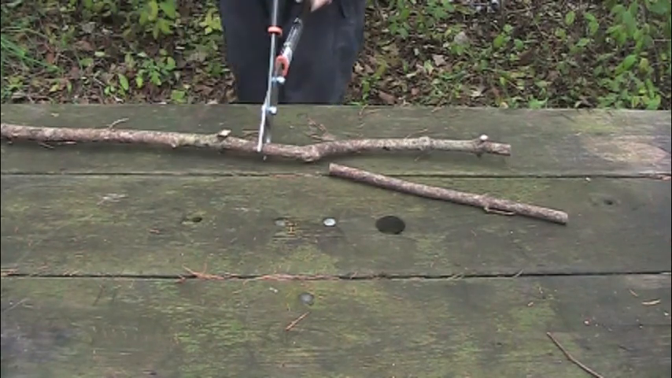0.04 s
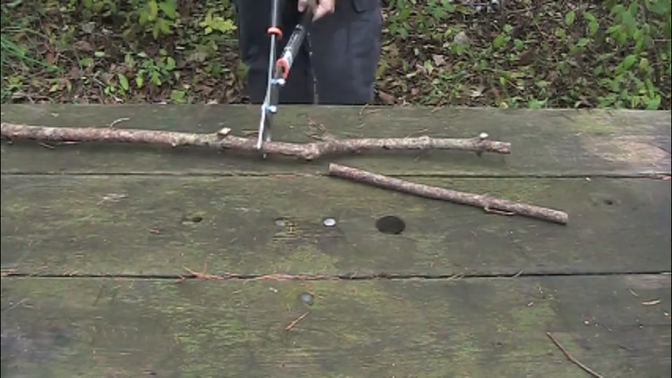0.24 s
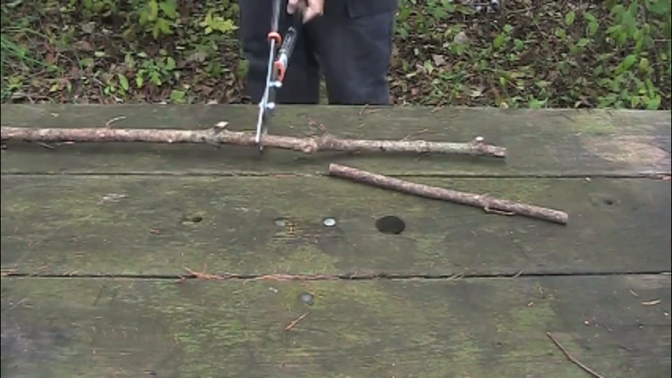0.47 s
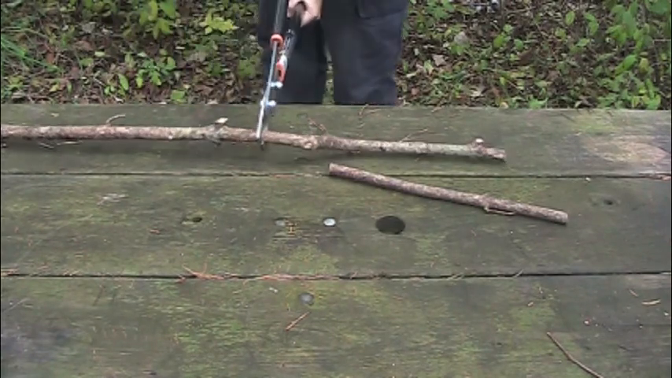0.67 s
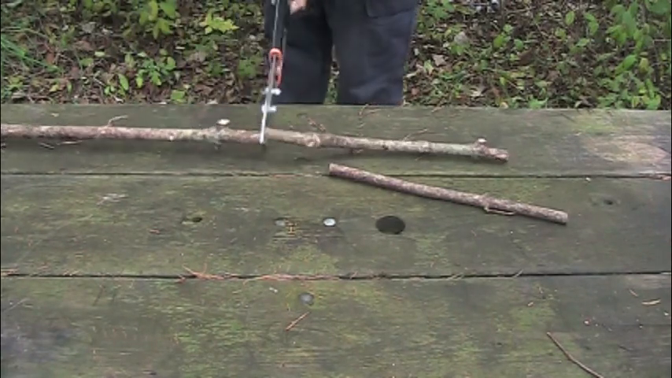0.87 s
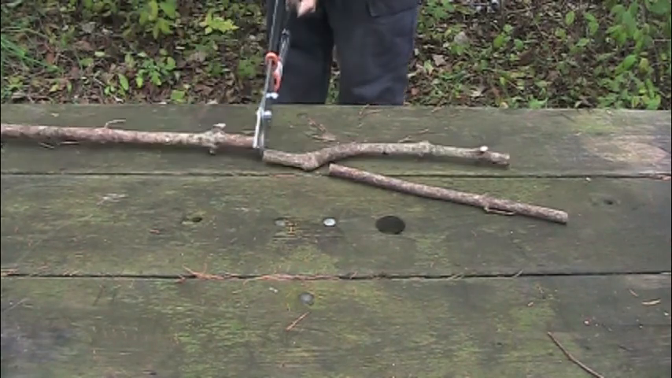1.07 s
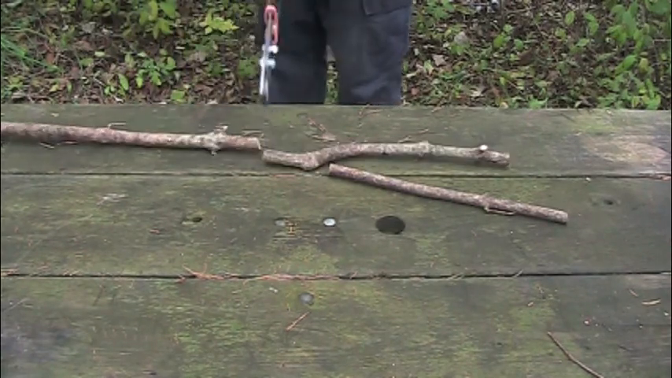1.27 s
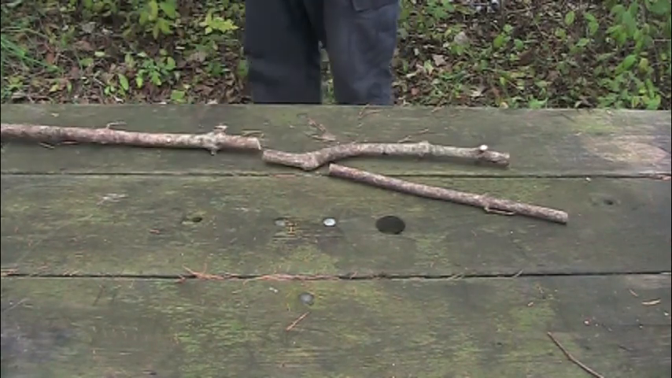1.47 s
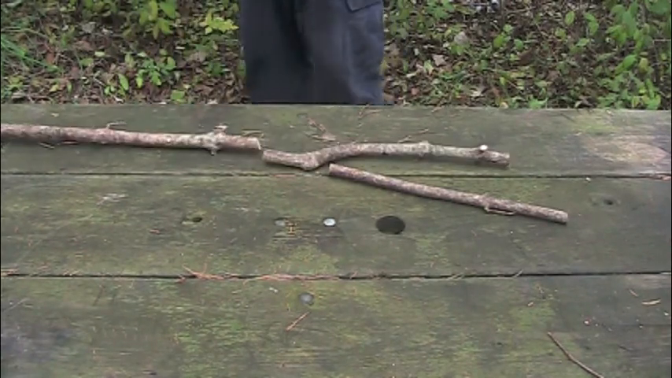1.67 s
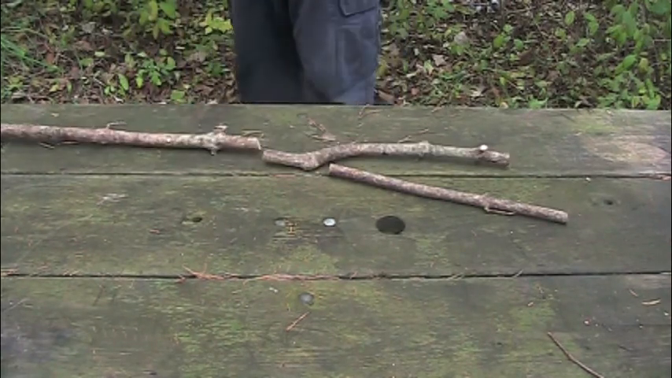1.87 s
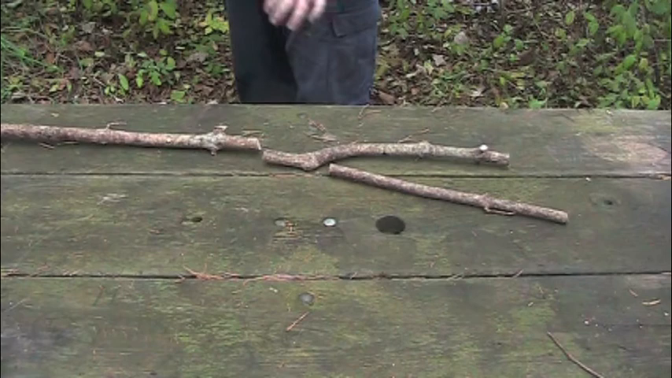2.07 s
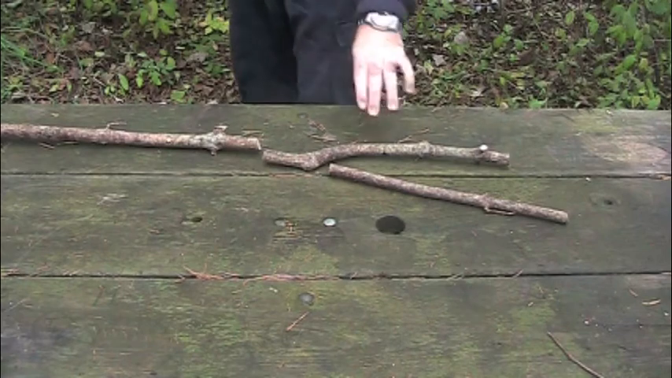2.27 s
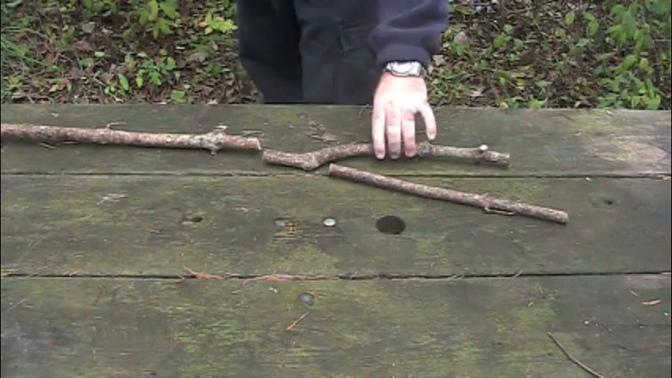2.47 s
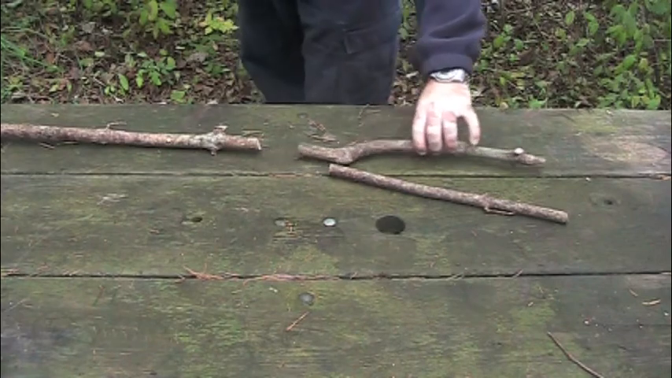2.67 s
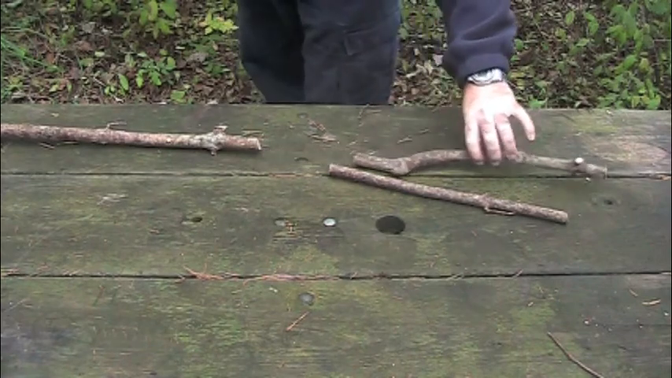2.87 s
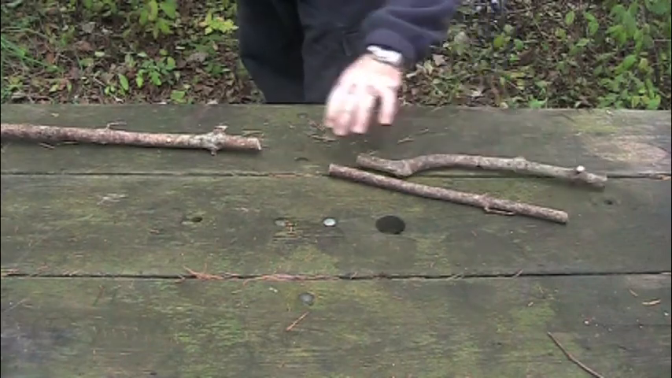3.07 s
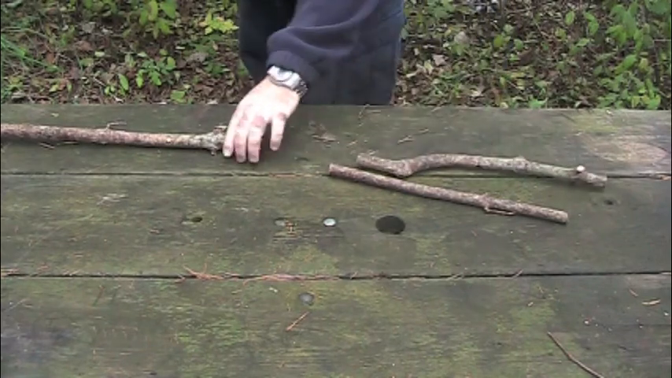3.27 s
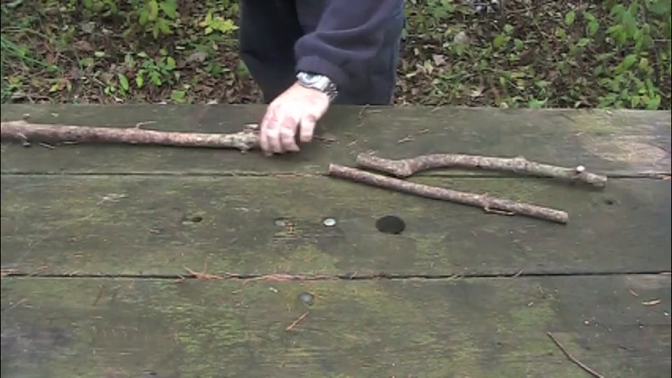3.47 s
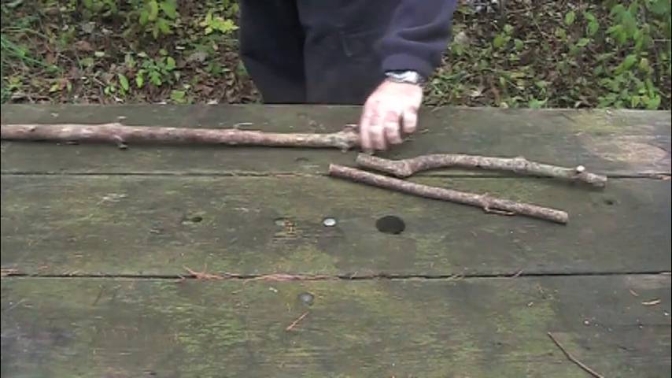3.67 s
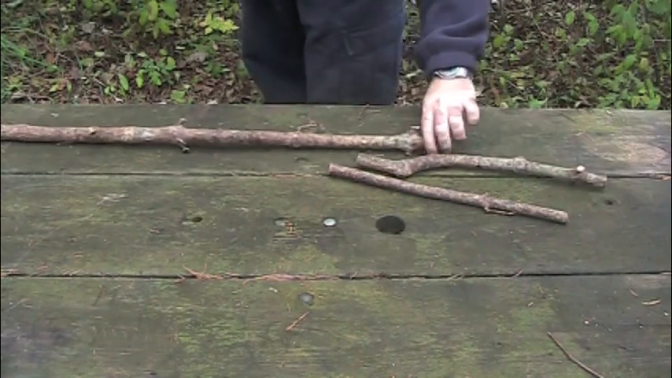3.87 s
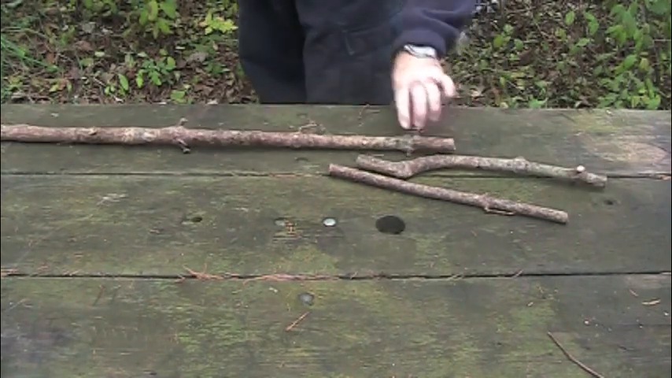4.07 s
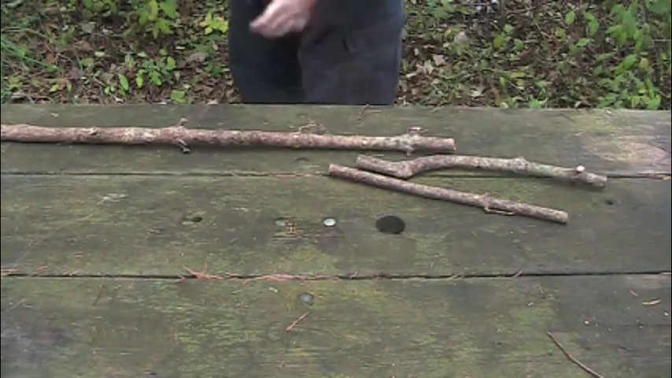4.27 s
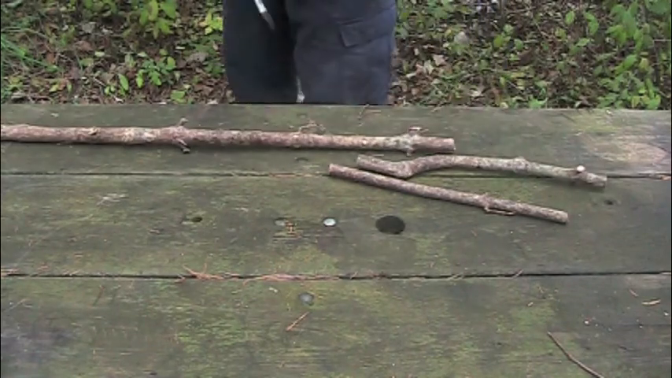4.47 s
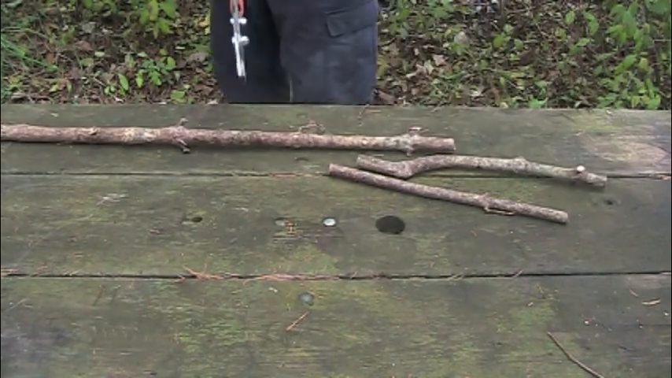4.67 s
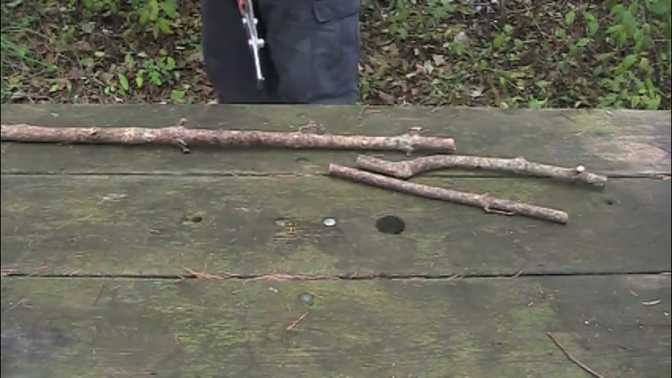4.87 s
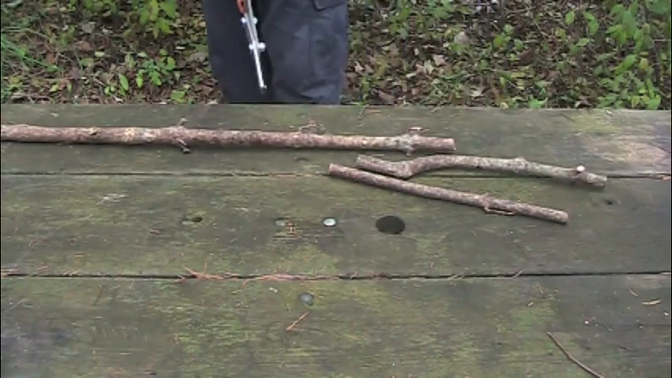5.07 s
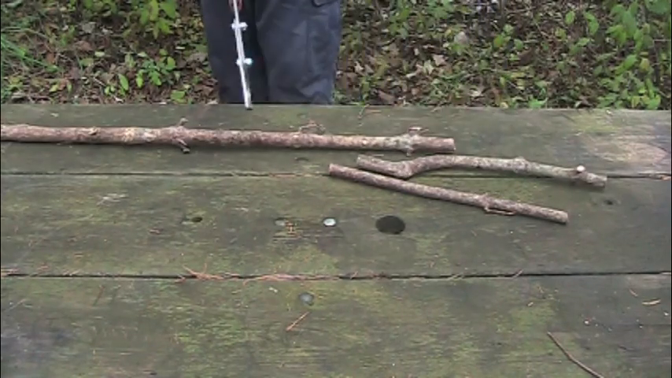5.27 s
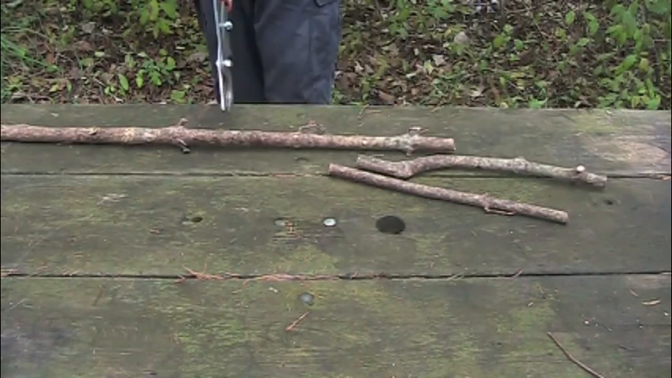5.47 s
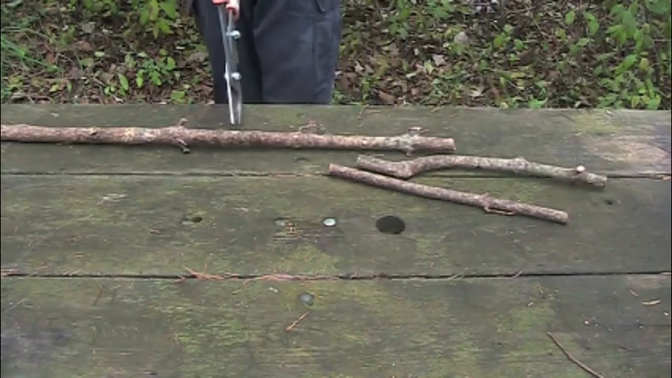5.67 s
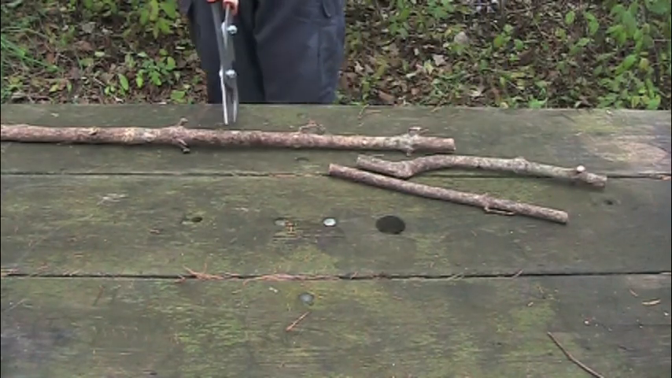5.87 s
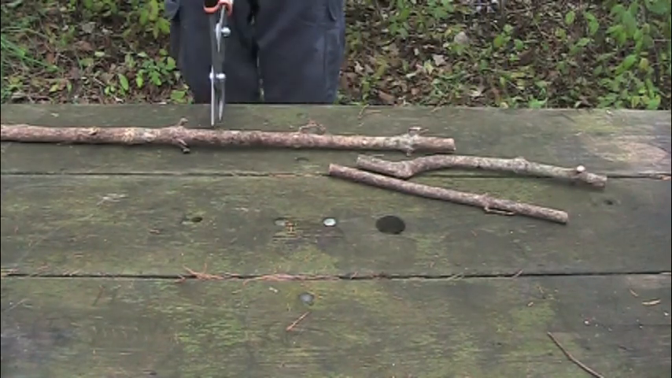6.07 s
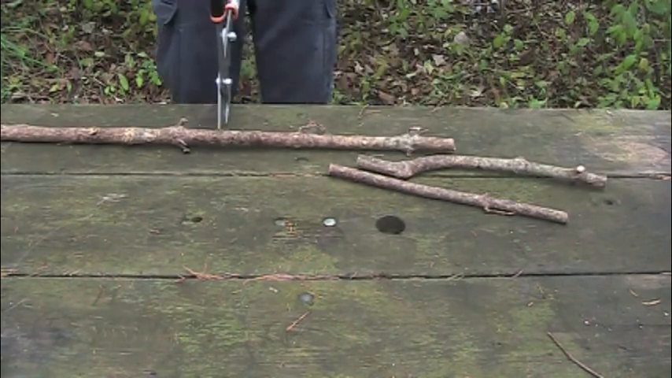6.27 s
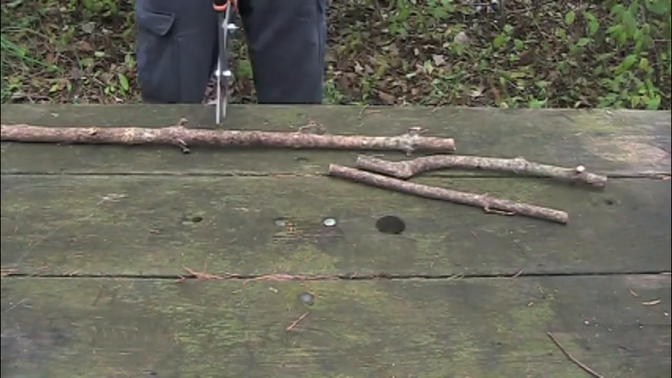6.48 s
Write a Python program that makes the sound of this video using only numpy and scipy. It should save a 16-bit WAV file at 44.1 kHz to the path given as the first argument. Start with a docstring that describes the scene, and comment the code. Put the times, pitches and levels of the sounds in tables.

```python
"""Loppers bite into a stick on a plank table outdoors: the pivot clicks brightly, and noise bursts for cracking
fibres ring the blade. The cut piece drops and bounces, is tossed aside by hand, and the branch is dragged:
blows and slips ring the planks. Sleeves rustle and something brushes past, both as swelling noise; the handles
knock as short coloured bursts. Behind lie a steady noise of far traffic and leaves, a faint far whine that
swells once, a small motor close by that ticks in a steady pattern, and faint echoes."""
import sys
import numpy as np
from scipy import signal
from scipy.fft import rfft, irfft
from scipy.io import wavfile

SR = 44100
rng = np.random.default_rng(int(sys.argv[2]) if len(sys.argv) > 2 else 0)


def materialize(psi):
    """Save the field psi as 16-bit PCM at rate SR to the path in sys.argv[1].

    A 1-D psi becomes a single channel; in a 2-D psi each row is a channel.
    """
    bounded = np.clip(np.atleast_2d(psi).T, -1, 1)
    quanta = np.round(bounded * 32767).astype(np.int16)
    wavfile.write(sys.argv[1], SR, quanta)


N = 288400   # length in samples
LEFT_DB = -1   # left against right, for all but the tool and the blows


def amp(db):
    """Turn decibels into a plain gain."""
    return 10 ** (np.asarray(db) / 20)


def rms_one(x):
    """Scale a sound to an rms of 1."""
    return x / np.sqrt(np.mean(x ** 2) + 1e-20)


def at_hz(points, hz):
    """Read a curve at a frequency, with straight lines over log frequency."""
    table_hz, values = np.transpose(points)
    return np.interp(np.log(hz), np.log(table_hz), values)


def sides(left_db):
    """Left and right gains for a level difference."""
    return amp(np.array([[.5], [-.5]]) * left_db)


def drift(rate):
    """A slow random wander of rms 1; a higher rate wanders faster."""
    step = 40   # samples between the points of the slow curve
    r = np.exp(-2 * np.pi * step * rate / SR)
    white = rng.standard_normal(N // step + 2002)
    slow = signal.lfilter([1], [1, -2 * r, r * r], white)[2000:]
    return np.interp(np.arange(N) / step, np.arange(len(slow)), rms_one(slow))


def ring(x, hz, t60):
    """A unit click sets off a sine of height 1 that falls 60 dB in t60 seconds."""
    r, w = amp(-60 / (t60 * SR)), 2 * np.pi * hz / SR
    return signal.lfilter([0, np.sin(w)], [1, -2 * r * np.cos(w), r * r], x + 1e-18)


def resonate(x, hz, width):
    """A resonance lets through sound around hz, with gain 1 on top."""
    r = np.exp(-np.pi * width / SR)
    feedback = [1, -2 * r * np.cos(2 * np.pi * hz / SR), r * r]
    return signal.lfilter(np.array([1, 0, -1]) * (1 - r * r) / 2, feedback, x)


def swells(rows):
    """Each row rises, holds and falls; one gain in time per level column, powers added."""
    t, power = np.arange(N) / SR, 1e-20
    for s, rise, hold, fall, *levels_db in rows:
        before = (s - t) / max(rise, .002)
        after = (t - s - abs(hold)) / max(fall, .002)
        below = np.maximum(before, after).clip(0, 6)   # in steps of 20 dB
        power = power + amp(2 * (np.array(levels_db)[:, None] - 20 * below))
    return np.sqrt(power)


def band_swell(rows, hz, width):
    """Noise sent twice through a resonance, swelling by the rows."""
    noise = resonate(rng.standard_normal(N), hz, width)
    return swells(rows)[0] * rms_one(resonate(noise, hz, width))


def banded_noise(spectrum, likeness, patchy_db, grain_db):
    """Half-octave bands of stereo noise, each with its own level, flicker and likeness; rms 1."""
    out, together = 0, drift(9.1)
    edges = 2 ** np.arange(np.log2(spectrum[0][0]), np.log2(spectrum[-1][0]) + .3, .5)
    white = rng.standard_normal((2, 2, N)) * amp(grain_db * drift(130))   # grains come in clumps
    for k, (low, high) in enumerate(zip(edges, edges[1:])):
        band = signal.butter(2, [low, high], "band", fs=SR, output="sos")
        mid, side = signal.sosfilt(band, white[k % 2])
        hz = np.sqrt(low * high)
        alike = np.clip(at_hz(likeness, hz), -1, 1)
        gain = amp(at_hz(spectrum, hz) + patchy_db * (0.62 * together + drift(9.2)))
        out = out + gain * (np.sqrt(1 + alike) * mid + np.sqrt(1 - alike) * side * [[1], [-1]])
    return rms_one(out)


def bursts(rows, width, order=1, uneven_db=0):
    """Each row is a puff of noise that dies away, coloured by a broad resonance (twice: purer)."""
    out, size = np.zeros(N), SR // 10
    t = np.arange(size) / SR
    noise = rng.standard_normal((len(rows), size))
    noise = noise * amp(uneven_db * rng.exponential(1, noise.shape).clip(0, 4))
    for (s, db, hz, t60), white in zip(rows, noise):
        fall = amp(-60 * t / max(t60, .002))
        puff = white * fall
        for _ in range(order):
            puff = resonate(puff, min(hz, 16000), width * hz)
        start = round(s * SR)
        same_energy = np.sqrt((fall ** 2).sum() / (puff ** 2).sum())
        out[start:start + size] += amp(db - 7.5) * puff * same_energy   # peaks stand above the rms
    return out


# short noise bursts: cracking fibres, a few knocks and the blow's noisy tail:
# t/s, level/dB before the blade, f/Hz, t60/s
CRACKS = [(0.3611, -24, 4100, 0.014), (.535, -54, 3330, 0.011), (0.6275, -35.5, 3540, 0.0036),
          (0.6799, -38, 4250, 0.025), (0.7063, -34, 3624, 0.012), (.65, -44.5, 3703, .015),
          (.672, -45, 4210, 0.013), (.721, -47, 4206, 0.011), (0.7906, -38.5, 3494, 0.012),
          (.801, -46, 6280, 0.01), (0.8128, -30, 3492, 0.009), (0.8294, -40, 3557, 0.011),
          (.848, -38.5, 3325, .012), (0.8678, -21.5, 3480, 0.04), (0.8737, -8, 3000, 0.016),
          (.8745, -13, 6600, .02), (0.8755, -18, 1915, 0.02), (0.8864, -29.5, 2970, 0.035),
          (0.8992, -25, 4500, 0.02), (0.9015, -13, 3211, 0.015), (0.903, -21.5, 1500, 0.045),
          (0.9295, -15.5, 1960, 0.03), (.938, -31, 1600, .09), (1.074, -37.5, 4900, 0.018),
          (2.089, -50, 6280, 0.02), (2.9462, -39.5, 3220, 0.0095), (3.4765, -52, 3000, 0.019),
          (4.0427, -55, 3510, 0.047)]
UNEVEN_DB = 3   # how uneven the grains within one burst are
# the blade shearing through the wood: t/s, level/dB before the blade
SHEAR = [(.2, -80), (.37, -61), (.45, -61.5), (.5, -77.5), (.76, -58), (.81, -54.5), (.865, -46),
         (.922, -44), (.97, -88.5)]
FIBRES_PER_S = 1500
# resonances of the blade: f/Hz, width f/Hz, level/dB against each other
BLADE = [(700, 310, 4.5), (1222, 132, 8), (1600, 190, -1.5), (2190, 160, 1.5), (2550, 350, -3.5),
         (2940, 92, -10.5), (3169, 86, -1), (3370, 130, -2), (3733, 230, -4), (4370, 690, -3.5),
         (5000, 170, -18.5), (6210, 200, -7.5), (6540, 690, -4.5), (7000, 150, -9), (7550, 120, -15),
         (9360, 253, -17)]
BLADE_DB, BLADE_WAVER_DB, BLADE_WAVERS_PER_S = 7.5, 1.5, 25
# bright clicks of the pivot while the jaws close: t/s, level/dB
TICKS = [(.237, -47), (0.2576, -43), (0.276, -49), (0.2848, -37), (0.37, -31.5), (0.398, -43),
         (0.4026, -47), (0.418, -41), (0.4304, -37), (0.4435, -35), (0.453, -38), (0.492, -43), (.588, -50),
         (0.622, -38.5), (0.63, -32.5), (.6405, -45.5), (0.6504, -44), (0.68, -41), (0.741, -42.5),
         (0.868, -25), (0.871, -27)]
TICK_HZ, TICK_T60_S = 15510, 0.012
# handles knocking together: t/s, level/dB, f/Hz, t60/s
HANDLES = [(5.132, -33.5, 1024, 0.073), (5.1335, -41, 2680, 0.024), (5.146, -33.5, 1420, 0.04),
           (5.144, -38, 3740, 0.038), (5.1445, -42, 4850, .02), (5.146, -36, 558, 0.029),
           (5.2805, -41, 1320, 0.029), (5.282, -47, 583, 0.057), (5.489, -49, 1383, 0.049),
           (5.737, -48, 1306, 0.066)]


def loppers():
    """Noise bursts and shearing ring through the blade; pivot clicks and handle knocks stay dry."""
    shear_db = np.interp(np.arange(N) / SR, *np.transpose(SHEAR))
    sizes = amp(4.5 * rng.exponential(1, N).clip(0, 4)) * rng.choice([-1, 1], N)
    fibres = (rng.random(N) < FIBRES_PER_S / SR) * sizes   # many small fibres tearing
    fibres = resonate(resonate(fibres, 4000, 4100), 4000, 4100)
    cracks = bursts(CRACKS, width=0.61, uneven_db=UNEVEN_DB)
    driven = cracks + amp(shear_db) * rms_one(fibres)
    blade = 0
    for k, (hz, width, db) in enumerate(BLADE):
        # each resonance wavers at random; neighbours swing against each other
        gain = amp(db + BLADE_WAVER_DB * drift(BLADE_WAVERS_PER_S))
        blade = blade + gain * resonate(driven, hz, width) * (-1) ** k
    ticks = bursts([(s, db, TICK_HZ, TICK_T60_S) for s, db in TICKS], width=0.538)
    knocks = bursts(HANDLES, width=0.29, order=2)
    return cracks * 0.59 + amp(BLADE_DB) * blade + ticks + knocks


# blows of wood on the planks: t/s, level/dB of the push, contact/ms,
# extra level/dB into the deep planks, extra level/dB into the frame, left-right level/dB
BLOWS = [(0.442, -40.5, 5.2, 5.5, 12, -5), (0.666, -42.5, 3, 12, -5.5, -5),
         (0.9215, -41, 2.2, 19, 7, -11.5), (0.93, 2, 0.53, -0.5, -2.5, -3.5),
         (0.9348, -8.5, 3.2, 3.5, 4.5, -2.5), (0.9532, -15, 1.1, 0, -4, -5), (0.968, -16.5, 2.3, 7, -6, -1),
         (1.02, -41, 3.1, 6, 3, -4), (1.0883, -25, 0.84, 3.5, 2, -3), (1.092, -24, 0.67, -21, -22, -3.5),
         (1.111, -53, 2.3, 7, 11, -8.5), (1.131, -50, 2, 17, 2, -12), (1.165, -45, 2.9, 9, 2, -5),
         (1.193, -40.5, 2.1, 17.5, 9.5, -3), (1.205, -40.5, 2.2, 0, 14, -6),
         (1.229, -42.5, 3.2, 10, -2, -7), (1.262, -48, 3.1, 15.5, 10, -6), (1.295, -51, 3.4, 14, 13, -2),
         (1.372, -50, 2.5, 12, 12, -2.5), (2.847, -62, 2.4, -2.5, 32, -1.5), (2.877, -49, 2.7, 14, 13, -2),
         (2.899, -48, 1.4, -6, -3, -3), (2.935, -43.5, 0.67, 24.5, 4, -5), (2.946, -15, 0.71, -8, -1.4, -4),
         (2.958, -31.5, 2.36, 7.5, -5, -3), (2.975, -50.5, 1.5, 21, -11, -3), (2.992, -29, 2, -10, 9, -3),
         (3.026, -41, 2.6, 3.5, 10, -4), (3.936, -49, 2, 11, 16.5, -1)]
RATTLE_DB, RATTLE_T60_S, RATTLE_HZ = -34, .1, 2500   # trembling after each blow, dull above RATTLE_HZ
# the branch rubbing on the planks, one row a stroke: peak t/s, rise t/s, hold t/s, fall t/s,
# level/dB, extra level/dB into the deep planks; rise and fall span 20 dB
RUB = [(0.001, 0.063, 0.054, 0.017, -51.5, 2.5), (0.373, 0.15, .005, 0.042, -43.5, 9),
       (0.44, 0.045, 0.038, 0.02, -45.5, 10), (0.77, 0.26, 0.11, 0.017, -58, 17),
       (0.858, 0.0057, 0.064, 0.016, -29.5, 0), (1.135, .05, 0.047, 0.098, -43.5, 12.5),
       (1.249, .05, 0.054, 0.2, -57, 12.5), (3.536, 0.25, 0.066, 0.084, -55, 6.5),
       (3.492, 0.11, 0.044, 0.11, -48.5, 12.5), (3.637, 0.19, 0.052, 0.13, -36.5, 6),
       (3.775, 0.14, 0.014, 0.095, -65, 5), (4.052, 0.37, 0.02, 0.015, -53.5, 10)]
RUB_PER_S = 1200
# colour of the rasping bark: f/Hz, width f/Hz, level/dB
SCRAPE = [(997, 570, 1.5), (2300, 1100, -1)]
SCRAPE_DB = 27
# ringing of the planks: f/Hz, level/dB at the cut, level/dB where the piece lands,
# level/dB under the dragged branch, t60/s before the limit below
PLANKS = [(82.34, -10.5, -11.5, -27, .2), (140, -19, -15.5, -20.5, 0.13), (163.1, -20, -18, -15.5, 0.27),
          (195.2, -18, -19.5, -22, 0.36), (225.5, -21, -11, -15, 0.35), (253.4, -19, -14, -21.5, 0.3),
          (327, -24.5, -19, -24, 0.28), (372.1, -14, -15, -25, 0.14), (414.6, -16, -32, -9, .14),
          (480, -19, -7.5, -9, 0.15), (522, -16.5, -6.5, -9, 0.14), (563, -26, -21, -13, 0.15),
          (599, -23.5, -11, -6.5, 0.073), (685, -24.5, -8.5, -17, 0.069), (710, -24.5, -9, -20, 0.063),
          (767, -26.5, -14, -14, 0.093), (820, -21, -37, -22, 0.021), (885, -22.5, -26, -8.5, 0.051),
          (977, -34, -31, -21, 0.084), (1092, -8, -17, -14, 0.016), (1191, -34, -16.5, -8, 0.041),
          (1443, -25, -13, -16, 0.053), (1530, -20.5, -23, -13.5, 0.05), (1640, -24, -14, -10, 0.025),
          (1885, -14.5, -11.5, -21, .05), (2060, -21, -8, -16.5, 0.044), (2300, -28.5, -30, -31, 0.018)]
# short knock of the stick itself: same columns
THUDS = [(425, 6.5, 9.5, -15.5, 0.014), (185.2, 0.5, -2.5, -17, 0.027), (1190, -8.5, -5.5, -16, 0.0077),
         (1800, -21, -6, -27, 0.013)]
LONGEST_RING_CYCLES = 70   # damp wood lets no mode ring longer
FRAME_HZ, DEEP_HZ = 185, 320   # the frame rings below the first, the deep planks up to the second
RADIATES_ABOVE_HZ = 140
TOSSED_S, DRAGGED_S = 2.5, 3.3   # from here on the wood meets another place of the table
WOOD_RESTS_S = 4.6   # the plank ringing stops here


def planks():
    """Blows and rubbing drive the same plank modes; a longer contact is duller."""
    frame, deep, high = np.zeros((3, 2, N + SR))
    t = np.arange(SR // 8) / SR
    dull = signal.butter(1, RATTLE_HZ, fs=SR)
    rattles = signal.lfilter(*dull, rng.standard_normal((len(BLOWS), len(t))))
    rattles = rattles * amp(RATTLE_DB - 60 * t / RATTLE_T60_S)
    for (s, db, contact_ms, deep_db, frame_db, left_db), force in zip(BLOWS, rattles):
        force[0] = 1   # the blow itself, then the stick trembles against the grain
        push = np.hanning(max(round(contact_ms * SR / 1000), 1) + 2)
        force = amp(db) * sides(left_db) * np.convolve(force, push / push.sum())
        start = round(s * SR)
        at = slice(start, start + force.shape[1])
        high[:, at] += force
        deep[:, at] += amp(deep_db) * force
        frame[:, at] += amp(frame_db) * force

    # bark rasps when dragged, less when it rolls
    strokes = [(*shape, db, db + deep_db, db + SCRAPE_DB - 2 * deep_db) for *shape, db, deep_db in RUB]
    rub, rub_deep, rasp = swells(strokes)
    slips = (rng.random(N) < RUB_PER_S / SR) * rng.standard_normal(N)   # bark catching on the grain
    slips = amp(-18.0) * slips * sides(LEFT_DB)
    busy = int(WOOD_RESTS_S * SR)
    frame = (frame[:, :N] + rub_deep * slips)[:, :busy]
    deep = (deep[:, :N] + rub_deep * slips)[:, :busy]
    high = (high[:, :N] + rub * slips)[:, :busy]

    # each place wakes the modes in its own measure
    place = np.searchsorted([TOSSED_S, DRAGGED_S], np.arange(busy) / SR)
    sound = 0
    for body in (PLANKS, THUDS):
        for k, (hz, *place_db, t60) in enumerate(body):
            force = frame if hz < FRAME_HZ else deep if hz < DEEP_HZ else high
            mode = ring(amp(place_db)[place] * force, hz, min(t60, LONGEST_RING_CYCLES / hz))
            sound = sound + mode * (-1) ** k   # neighbouring modes swing against each other
    sound = np.pad(sound, [(0, 0), (0, N - busy)])
    for hz, width, db in SCRAPE:
        sound = sound + amp(db) * resonate(rasp * slips, hz, width)
    radiate = signal.butter(3, RADIATES_ABOVE_HZ, "high", fs=SR, output="sos")
    return signal.sosfilt(radiate, sound)


# sleeves and leaves stirred, one row a movement: peak t/s, rise t/s, hold t/s, fall t/s,
# swish level/dB, hiss level/dB; rise and fall span 20 dB
RUSTLE = [(.318, 0.13, 0.13, 0.096, -54.5, -62), (.628, 0.013, .001, 0.61, -84, -71),
          (.85, 0.14, 0.07, 0.12, -51.5, -61), (1.072, 0.017, 0.00095, 0.015, -53, -80),
          (1.578, 0.03, 0.013, 0.13, -63.5, -57.5), (1.768, 0.32, 0.033, 0.032, -74, -59),
          (2.008, 0.039, 0.012, 0.057, -52, -59.5), (2.59, 1, 0.012, 0.58, -71, -81),
          (3.5, 0.066, 0.02, 0.13, -71.5, -65), (3.66, 0.15, 0.068, 0.13, -71, -62.5),
          (4.4, 0.14, 0.089, 0.14, -68.5, -76), (4.59, 0.1, 0.073, 0.25, -79, -61.5),
          (4.96, 0.12, 0.23, 0.063, -63, -61.5), (5.135, 0.084, 0.011, 0.037, -48, -69),
          (5.49, 0.2, 0.028, 0.14, -67, -76), (5.74, 0.11, 0.0055, 0.048, -66.5, -84),
          (5.97, 0.11, 0.13, 0.083, -65, -70.5), (6.29, 0.23, 0.046, 0.44, -55, -58)]
# colour of the lower swish: f/Hz, level/dB per Hz
SWISH = [(240, -49), (400, 1.5), (456, -4.5), (521, -0.5), (686, 1), (1260, 1.5), (1460, 2.5), (1600, 0),
         (7000, -10.5), (9100, -38.5), (15400, -120)]
# colour of the higher hiss: f/Hz, level/dB per Hz
HISS = [(2350, -29.5), (4000, 2), (5100, -9), (6660, 5), (7980, 1), (9720, -7), (14200, 0.5),
        (16000, -11.5)]
# how alike left and right are: f/Hz, likeness (1 = the same, 0 = unrelated)
RUSTLE_LIKENESS = [(60, 0.78), (180, 0.4), (550, 1), (1650, 0.53), (4970, 0.083), (15000, 0.34)]
STIR_SWISH_DB, STIR_HISS_DB = -65, -75   # faint stirring in between
STIR_SWING_DB, STIR_PER_S = 1.5, 4


def rustle():
    """Rubbing cloth and leaves: a low swish and a high hiss of noise, swelling with each movement."""
    stir_db = np.array([[STIR_SWISH_DB], [STIR_HISS_DB]]) + STIR_SWING_DB * drift(STIR_PER_S)
    swish, hiss = swells(RUSTLE) + amp(stir_db)
    low = swish * banded_noise(SWISH, RUSTLE_LIKENESS, patchy_db=2.0, grain_db=1.5)
    return low + hiss * banded_noise(HISS, RUSTLE_LIKENESS, patchy_db=1.5, grain_db=1.0)


# something brushes past: peak t/s, rise t/s, hold t/s, fall t/s, level/dB
BRUSH = [(6.27, 0.052, 0.14, 0.3, -56)]
BRUSH_HZ, BRUSH_WIDTH_HZ = 2120, 2100


def brush():
    """A broad rustle around 2 kHz, between swish and hiss: noise that swells and fades."""
    return band_swell(BRUSH, BRUSH_HZ, BRUSH_WIDTH_HZ)


# colour of the far traffic and leaves: f/Hz, level/dB per Hz
AIR = [(13, -41), (22, -17.5), (56, -2.5), (87, -1), (211, -9.5), (710, -12.5), (2900, -25), (4140, -30),
       (4630, -37.5), (8490, -40), (12500, -35.5), (14300, -37.5), (16000, -56)]
AIR_DB = -55.5
# how alike left and right are: f/Hz, likeness (1 = the same, 0 = unrelated, below 0 = opposed)
LIKENESS = [(60, 1), (180, -0.037), (550, -0.12), (1650, -0.96), (4970, -0.5), (15000, -0.49)]


def air():
    """Far traffic and leaves: steady stereo noise, strongest in the bass, flickering a little."""
    return amp(AIR_DB) * banded_noise(AIR, LIKENESS, patchy_db=1.6, grain_db=0.15)


# a faint far whine: peak t/s, rise t/s, hold t/s, fall t/s, level/dB
WHINE = [(2.3, 0.35, .45, 0.13, -73.5)]
WHINE_HZ, WHINE_WIDTH_HZ = 1970, 150


def whine():
    """A blurred tone far off: narrow noise that swells and fades."""
    return band_swell(WHINE, WHINE_HZ, WHINE_WIDTH_HZ)


# ringing of one motor tick: f/Hz, level/dB, t60/s
MOTOR = [(3860, -65, 0.022), (4060, -61, 0.019)]
# which clock steps of each pattern tick: step number
TICK_STEPS = [0, 3, 5, 7]
STEP_S, PATTERN_STEPS, MOTOR_START_S = 1.001 / 60, 9, 0.00032


def motor():
    """Four ticks in every nine steps of a steady clock, each a click that rings briefly."""
    patterns = np.arange(N // round(PATTERN_STEPS * STEP_S * SR) + 1)
    steps = (patterns[:, None] * PATTERN_STEPS + TICK_STEPS).ravel()
    at = np.round((steps * STEP_S + MOTOR_START_S) * SR).astype(int)
    at = at[at < N]
    clicks = np.zeros(N)
    clicks[at] = amp(1.5 * rng.standard_normal(len(at)))   # no two quite equally loud
    return sum(amp(db) * ring(clicks, hz, t60) for hz, db, t60 in MOTOR)


ECHO_DB, ECHO_T60_S, ECHO_HZ = -32.5, 0.6, 3496   # dull above ECHO_HZ


def echoes(x):
    """Scatter from ground and trunks: a dull dying noise of its own on each side."""
    t = np.arange(SR // 3) / SR
    fade = amp(-60 * t / ECHO_T60_S) * np.minimum(t / 0.0031, 1)   # a soft start
    tail = rng.standard_normal((2, len(t))) * fade
    tail = signal.sosfilt(signal.butter(1, ECHO_HZ, fs=SR, output="sos"), tail)
    tail = tail / np.sqrt((tail ** 2).sum() / 2)
    return amp(ECHO_DB) * signal.fftconvolve(x[None], tail, axes=1)[:, :N]


TOOL_LEFT_DB, RIGHT_LAG_S = -3, 1.3e-5   # the tool is louder on the right and comes later there


def scene():
    """All sources, near the middle and a little louder on the right."""
    tool, table = loppers(), planks()
    hz = np.arange(N // 2 + 1) * SR / N
    late = irfft(rfft(tool) * np.exp(-2j * np.pi * hz * RIGHT_LAG_S), N)   # less than a sample late
    near = np.array([tool, late]) * sides(TOOL_LEFT_DB) + table
    around = rustle() + brush() + air() + whine() + motor()
    return near + around * sides(LEFT_DB) + echoes(tool + table.mean(axis=0))


OVERLOAD, KNEE, LOPSIDED = 1, 4, .12   # ceiling, sharpness of the bend, share of the squared sound
CUTOFF_HZ = 15850


def record(dry):
    """The loudest blow overloads the input a little lopsidedly, which adds a low thump; the top is cut."""
    bent = dry / (1 + np.abs(dry / OVERLOAD) ** KNEE) ** (1 / KNEE)
    low = signal.butter(2, [20, 120], "band", fs=SR, output="sos")
    bent = bent + LOPSIDED * signal.sosfilt(low, bent ** 2)
    return signal.sosfilt(signal.ellip(10, .5, 70, CUTOFF_HZ, fs=SR, output="sos"), bent)


dry = scene()
out = record(dry)
materialize(out)
```